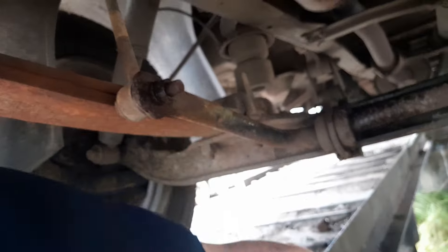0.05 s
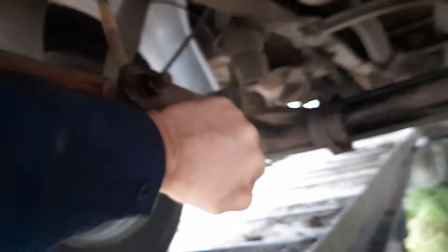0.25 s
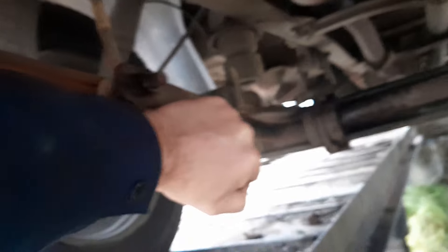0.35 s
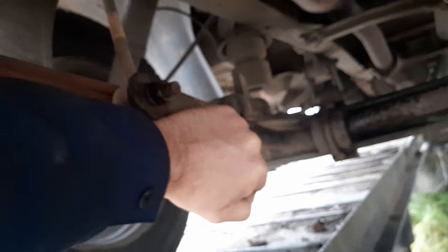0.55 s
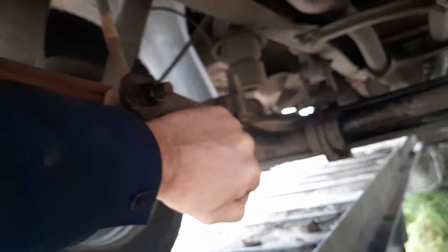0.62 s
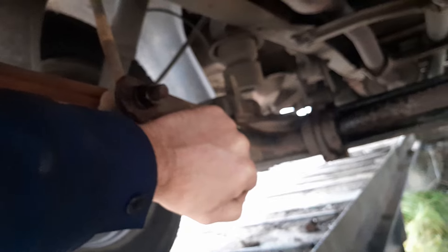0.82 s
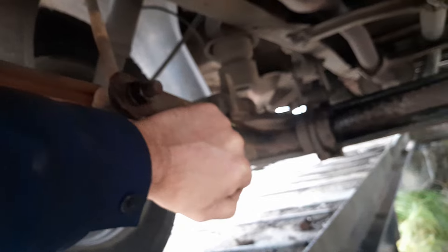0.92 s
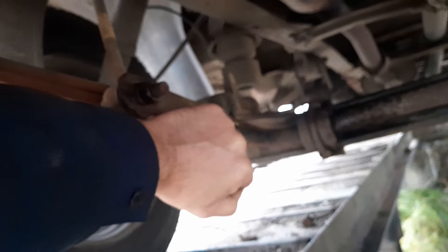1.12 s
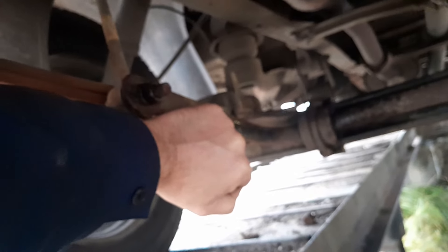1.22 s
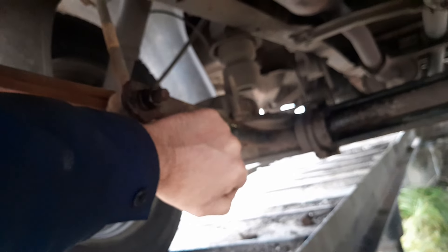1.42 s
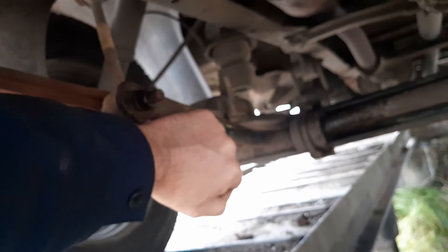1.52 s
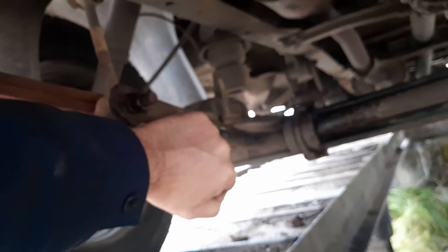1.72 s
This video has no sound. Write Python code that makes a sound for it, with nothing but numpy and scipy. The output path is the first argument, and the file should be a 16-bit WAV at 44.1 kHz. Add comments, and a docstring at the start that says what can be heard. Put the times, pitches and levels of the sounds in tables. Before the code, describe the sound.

Close by, beneath a vehicle, a loose metal link gives one loud, rattling clunk that rings and booms through the body. It settles with a few soft clicks and a slight echo, leaving a faint low rumble outdoors.

```python
"""Under a vehicle, a fist shoves a loose steel suspension link. For a tenth of a second it chatters
and grinds on its bolt, ringing the bracket, and the axle and body boom. The link then settles with a
few weak clicks. The clunk echoes between floor pan and ground, over a faint low rumble and outdoor air.
The two microphone ports are close to the link."""
import sys
import numpy as np
from scipy import signal
from scipy.fft import rfft, irfft
from scipy.io import wavfile
from scipy.ndimage import uniform_filter1d

SR = 44100
rng = np.random.default_rng(int(sys.argv[2]) if len(sys.argv) > 2 else 0)


def unload_audio(sound):
    """Save the sound as a 16-bit wav file, at the path given as the first command line argument."""
    columns = np.transpose(np.atleast_2d(sound))
    # keep every value between -1 and 1, then stretch to whole-number steps
    steps = np.round(np.clip(columns, -1, 1) * 32767)
    wavfile.write(sys.argv[1], SR, steps.astype(np.int16))


N = 77175
T = np.arange(N) / SR
HZ = np.fft.rfftfreq(N, 1 / SR)


def amp(db):
    """Decibels to gain."""
    return 10 ** (np.asarray(db) / 20)


def unit_rms(x):
    """Scales to rms 1."""
    return x / np.sqrt(np.mean(x ** 2) + 1e-20)


def curve_at(points, hz):
    """Interpolates a table on a log-frequency axis."""
    points_hz, values = np.transpose(points)
    return np.interp(np.log(hz + 1), np.log(points_hz + 1), values)


def colour(x, gain):
    """Filters by a gain per frequency."""
    return irfft(rfft(x) * gain, N)


def noise_pair(correlation):
    """White noise for two ports, correlated per frequency."""
    left, other = rng.standard_normal((2, N))
    alike = curve_at(correlation, HZ)
    return np.array([left, colour(left, alike) + colour(other, np.sqrt(1 - alike ** 2))])


def die_away(x, t60_table):
    """Decays each frequency at its own rate."""
    hz, t, spectra = signal.stft(x, SR, nperseg=256)
    decay = amp(-60 * t / curve_at(t60_table, hz[:, None]))
    return signal.istft(spectra * decay, SR, nperseg=256)[1][:, :N]


# Each row: frequency in Hz, share of the full port delay.
DELAY_SHARE = [(350, 0), (600, .25), (1100, .85), (2000, 1)]


def at_ports(pair, pan, full_delay_samples=22):
    """The left port is louder and leads; long waves reach both ports together."""
    delay_s = curve_at(DELAY_SHARE, HZ) * full_delay_samples / SR
    lag = np.exp(-2j * np.pi * HZ * delay_s)
    left_gain = amp(curve_at(pan, HZ))
    return np.array([colour(pair[0], left_gain), colour(pair[1], lag / left_gain)])


# Each row: frequency in Hz, relative spectral density in dB.
AIR_SPECTRUM = [(20, 3), (120, -1), (170, -6.5), (270, -6.5), (330, -21.5), (700, -18), (1100, -20),
                (1900, -25), (2400, -36.5), (3000, -47.5), (5500, -52.5), (7500, -46), (16000, -49.5)]
# Each row: frequency in Hz, left-right correlation.
AIR_CORRELATION = [(100, 0.75), (300, 0.96), (700, 0.15), (2000, 0.13), (5000, 0.033)]
# Each row: time in s, air level in dB.
AIR_LEVEL = [(0, -50), (.5, -49), (.9, -53.5), (1.25, -51.5), (1.75, -50.5)]
# Each row: time in s, rumble level in dB.
RUMBLE_LEVEL = [(0, -40), (.1, -43), (.2, -43.5), (.6, -52), (.9, -49), (1.05, -44.5), (1.14, -42),
                (1.36, -41.5), (1.44, -40), (1.52, -41), (1.75, -43)]
# Each row: frequency in Hz, left boost and right cut in dB.
BACKGROUND_PAN = [(60, 0.86), (300, 0.54), (2000, 0.1)]


def background(rumble_hz=66.2, half_width_hz=14.6):
    """Soft outdoor air over a narrow noise band that beats as a low rumble."""
    air = unit_rms(colour(noise_pair(AIR_CORRELATION), amp(curve_at(AIR_SPECTRUM, HZ))))
    air *= amp(np.interp(T, *np.transpose(AIR_LEVEL)))
    band = 1 / (1 + ((HZ - rumble_hz) / half_width_hz) ** 4)
    rumble = colour(noise_pair([(rumble_hz, 0.99)]), band)
    rumble /= np.sqrt(uniform_filter1d((rumble ** 2).mean(0), size=SR // 6))  # evens out slow swells
    rumble *= amp(np.interp(T, *np.transpose(RUMBLE_LEVEL)))
    return at_ports(air + rumble, BACKGROUND_PAN)


# Link hits bolt. Each row: start in s, relative level in dB, tilt in dB per octave.
KNOCKS = [(.23854, 0, -0.36), (.2508, 1, 1.5), (.2663, -3, -1), (.2713, 0.5, 2), (.2799, -8, 0),
          (.29138, 0, -0.4), (.30442, -3.5, 0), (.31124, -2, -1), (.31726, 1.5, -1.06), (.3302, -8, -3)]
# Link settles. Each row: start in s, relative level in dB, tilt in dB per octave.
SETTLING_CLICKS = [(.4410, -15, 0.5), (0.487, -24, -3), (0.5781, -28.5, -5), (0.6231, -21.5, 2),
                   (0.996, -54, 12), (1.0163, -53, 12.5)]
# Each row: frequency in Hz, relative level in dB, T60 in s.
LINK_MODES = [(1049, -11, .12), (1448, -9, .13), (1610, -10, .11), (1724, -11, .11), (2305, -5, .15),
              (2654, -9, .11), (2750, -8, .11), (2850, -8, .1), (3936, -10, .11), (4307, -12, .11),
              (4626, -13, .1), (5137, -9, .1), (5319, -10, .1), (6298, -13, .09)]
# Dense steel ring. Each row: frequency in Hz, relative spectral density in dB.
STEEL_SPECTRUM = [(150, 8), (350, -7.5), (600, 3.5), (900, 0), (1300, 0), (2000, -4), (2850, -6.5),
                  (3300, -11.5), (4200, -8.5), (5800, -12), (8400, -12), (9200, -23.5), (12500, -16.5),
                  (16000, -27)]
# Each row: frequency in Hz, T60 in s.
STEEL_T60 = [(200, 0.34), (1000, 0.14), (3000, 0.14), (7000, 0.099), (15000, 0.046)]
# Each row: frequency in Hz, left-right correlation.
STEEL_CORRELATION = [(250, 1), (700, 0.29), (3000, 0.2), (14000, 0.18)]
# Each row: frequency in Hz, left boost and right cut in dB.
STEEL_PAN = [(400, 3.7), (1100, .5), (2500, 2.5), (5000, 1.1), (9000, 3.5), (14000, 0.3)]
STEEL_DB = -36


def link(modes_db=-43, crack_db=-7.5, crack_decay_s=0.003, common_share=0.84):
    """Each contact with the bolt gives a short crack, a dense steel ring and the link's clear modes."""
    out = np.zeros((2, N))
    common = np.sqrt(common_share) * noise_pair(STEEL_CORRELATION)
    steel_gain = unit_rms(amp(curve_at(STEEL_SPECTRUM, HZ)))
    octaves = np.log2(np.maximum(HZ, 400) / 2500)  # tilt pivots at 2500 Hz, flat below 400 Hz
    modes = np.array([amp(modes_db + db - 60 * T / t60_s) * np.exp(2j * np.pi * hz * T)
                      for hz, db, t60_s in LINK_MODES])
    for start_s, level_db, tilt_db in KNOCKS + SETTLING_CLICKS:
        noise = common + np.sqrt(1 - common_share) * noise_pair(STEEL_CORRELATION)
        crack = amp(crack_db) * noise * np.exp(-T / crack_decay_s)
        ring = die_away(noise, STEEL_T60)
        phasors = np.exp(2j * np.pi * rng.random(len(LINK_MODES)))
        tones = (phasors @ modes).imag
        hit = amp(STEEL_DB) * colour(crack + ring, steel_gain) + tones
        start = round(start_s * SR)
        out[:, start:] += amp(level_db) * colour(hit, amp(tilt_db * octaves))[:, :N - start]
    return at_ports(out, STEEL_PAN)


def ringing(modes):
    """The decaying sines that one blow sets off."""
    return sum(amp(db - 60 * T / t60_s) * np.sin(2 * np.pi * hz * T) for hz, db, t60_s in modes)


# Each row: frequency in Hz, relative level in dB, T60 in s.
BRACKET_MODES = [(370.5, -1, .1), (408.4, 0.5, 0.31), (488.7, -7.5, 0.23), (562.5, 0, 0.28),
                 (612, -11.5, 0.22), (630.5, -13.6, 0.41), (700.4, -20.5, 0.84), (793, -12, 0.26)]


def bracket(gain_db=-43):
    """Every knock and click rings the hollow modes of the bracket that holds the bolt."""
    blow_spectrum = sum(amp(db) * np.exp(-2j * np.pi * HZ * start_s)
                        for start_s, db, _ in KNOCKS + SETTLING_CLICKS)
    ring = amp(gain_db) * colour(ringing(BRACKET_MODES), blow_spectrum)
    return at_ports([ring, ring], STEEL_PAN)


def scrape(gain_db=-17, slips_per_s=350, spread_db=5.5):
    """Between knocks the link grinds on the bolt: many tiny slips ring the same steel."""
    moving = (T > KNOCKS[0][0]) & (T < KNOCKS[-1][0])
    slipping = (rng.random(N) < slips_per_s / SR) & moving
    slips = slipping * amp(spread_db * np.clip(rng.standard_normal(N), -2, 2))
    steel_gain = unit_rms(amp(curve_at(STEEL_SPECTRUM, HZ)))
    ring = colour(die_away(noise_pair(STEEL_CORRELATION), STEEL_T60), steel_gain)
    return at_ports(amp(STEEL_DB + gain_db) * colour(ring, rfft(slips)), STEEL_PAN)


# Each row: peak time in s, relative level in dB, contact time in s.
SHOVES = [(0.246, -4.3, .00295), (0.2558, -12.5, 0.00122), (0.2637, 3.1, 0.0021), (0.2844, -9.5, 0.001),
          (0.3314, -6, 0.0026), (0.4345, -8.5, 0.012), (0.4428, -5.5, 0.0056)]
# Each row: frequency in Hz, relative level in dB, T60 in s.
AXLE_MODES = [(59.88, -12, 1.43), (90.46, -13, 1), (98.1, 5, .12), (132.4, -9.5, 0.6), (154.3, -2.1, 0.29),
              (184.6, -8, 0.6), (195.9, -3, 0.3), (217, -2.5, 0.32), (266, -9, 0.39), (271, -3.5, 0.49)]


def axle(gain_db=-22, pan_db=1.5, right_delay_s=0.00025):
    """Soft, heavy shoves and rebounds set the low modes of axle and body booming."""
    force = np.zeros(N)
    for peak_s, level_db, contact_s in SHOVES:
        push = np.exp(-((T - peak_s) / (contact_s / 2)) ** 2)
        force += amp(gain_db + level_db) * push / push.sum()
    boom = signal.fftconvolve(force, ringing(AXLE_MODES))[:N]
    delayed = np.interp(T - right_delay_s, T, boom)
    return np.array([boom * amp(pan_db), delayed * amp(-pan_db)])


# Each row: frequency in Hz, T60 in s.
ECHO_T60 = [(100, 1.09), (700, 1.66), (2500, 0.32), (6000, 0.96), (14000, 1.3)]
# Each row: frequency in Hz, gain in dB.
ECHO_GAIN = [(100, -25.5), (700, -14), (2500, -11.5), (6000, -31), (14000, -19.5)]


def echoes(clunk):
    """Reflections between floor pan and ground leave a weak diffuse tail."""
    tail = die_away(noise_pair(AIR_CORRELATION), ECHO_T60)
    tail = colour(tail / np.linalg.norm(tail[0]), amp(curve_at(ECHO_GAIN, HZ)))
    return signal.fftconvolve(clunk, tail, axes=1)[:, :N]


def scene():
    """The clunk, its echoes and the background."""
    clunk = link() + bracket() + scrape() + axle()
    return clunk + echoes(clunk) + background()


def record(dry):
    """The microphone's bass roll-off, then the band limit."""
    low_cut_hz, high_cut_hz = 51.8, 15900
    highpass = signal.butter(3, low_cut_hz, "high", fs=SR, output="sos")
    lowpass = signal.firwin(511, high_cut_hz, window=("kaiser", 9), fs=SR)
    return signal.oaconvolve(signal.sosfilt(highpass, dry), lowpass[None], "same")


dry = scene()
out = record(dry)
unload_audio(out)
```